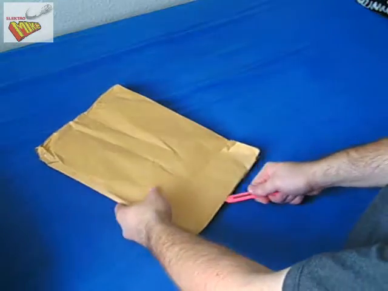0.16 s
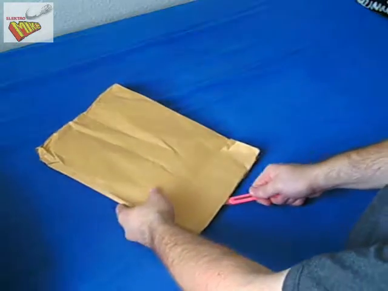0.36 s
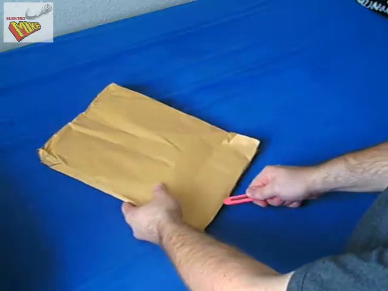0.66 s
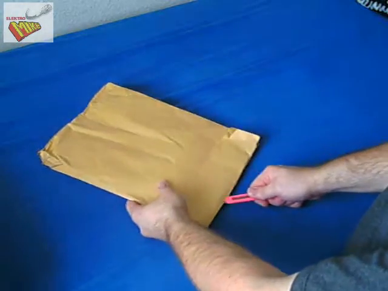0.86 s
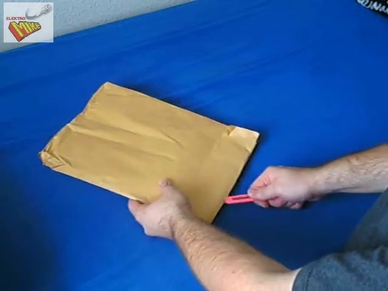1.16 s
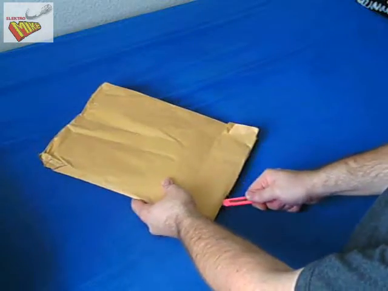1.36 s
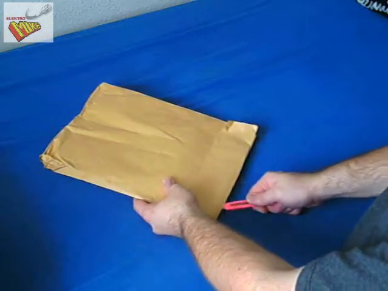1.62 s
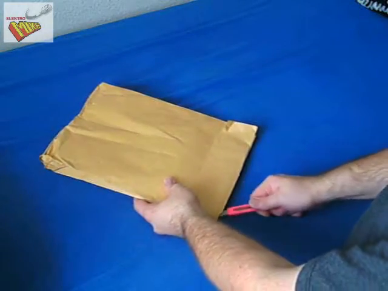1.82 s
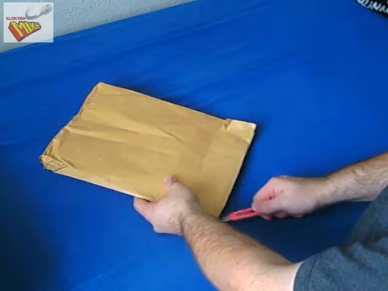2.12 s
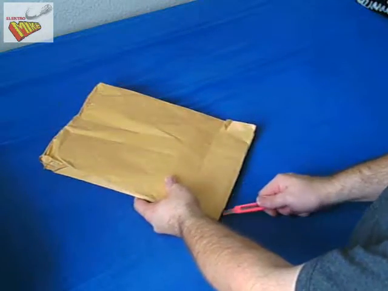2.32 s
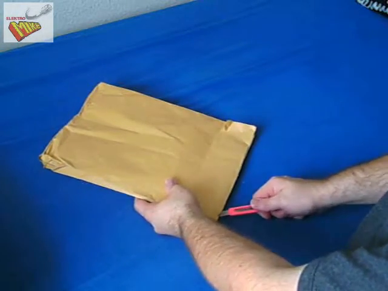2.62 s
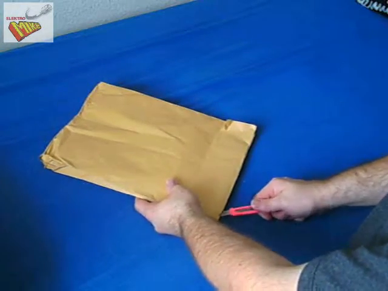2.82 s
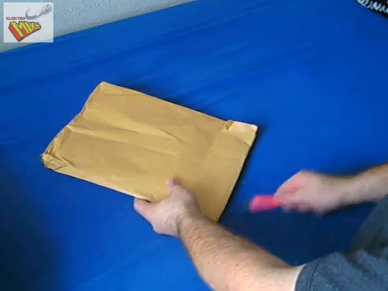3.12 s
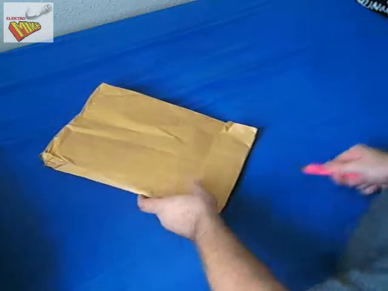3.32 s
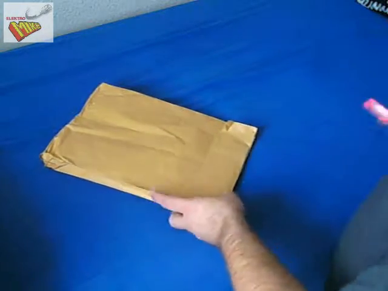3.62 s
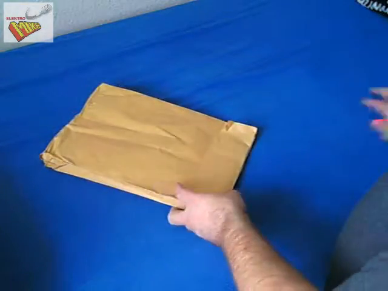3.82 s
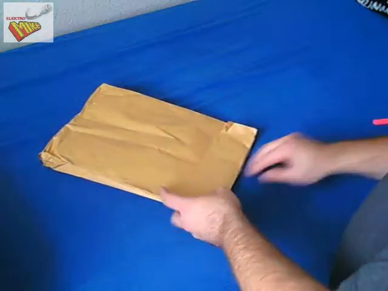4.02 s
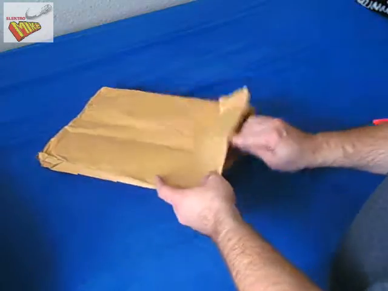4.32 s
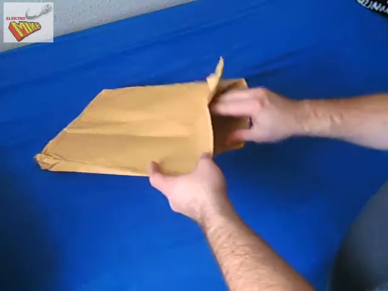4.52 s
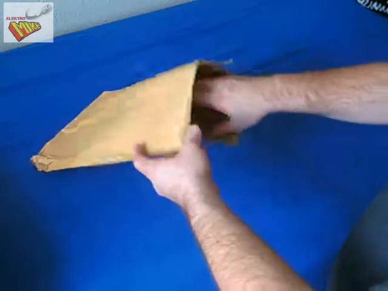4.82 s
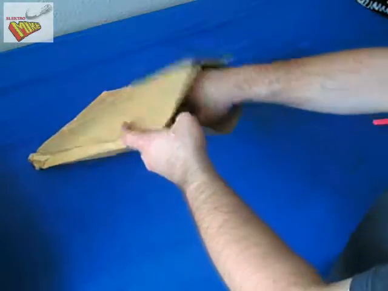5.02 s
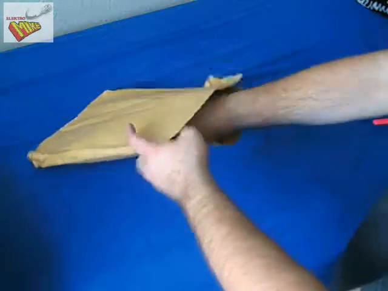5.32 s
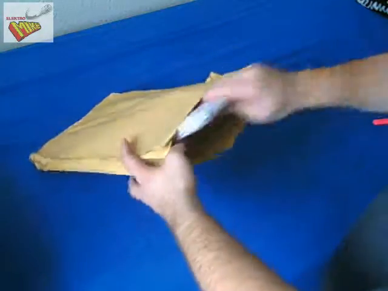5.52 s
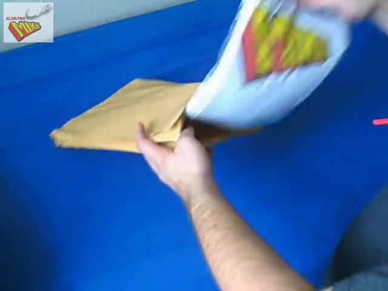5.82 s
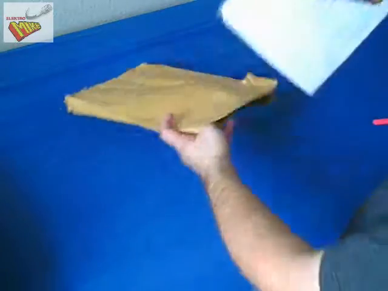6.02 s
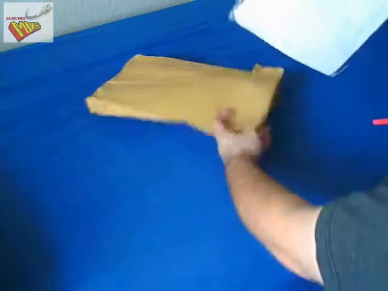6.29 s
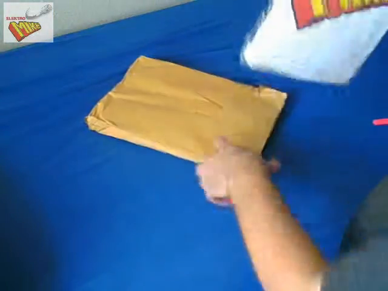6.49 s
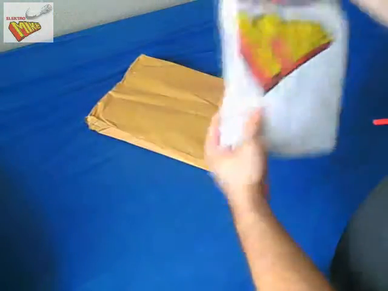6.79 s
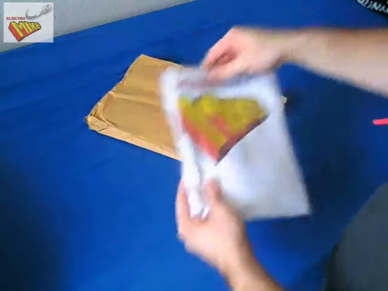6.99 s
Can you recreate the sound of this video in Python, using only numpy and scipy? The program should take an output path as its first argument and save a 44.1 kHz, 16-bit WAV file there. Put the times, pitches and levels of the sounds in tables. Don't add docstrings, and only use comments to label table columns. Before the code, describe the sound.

A cutter slits a stiff paper envelope in short rasping strokes, its slider rattles back, then the paper pops loudly open and a plastic-wrapped parcel rustles out.

```python
import sys
import numpy as np
from scipy import signal
from scipy.fft import rfft, irfft
from scipy.io import wavfile
from scipy.ndimage import uniform_filter1d

SR = 44100
rng = np.random.default_rng(int(sys.argv[2]) if len(sys.argv) > 2 else 0)


def gain_from_db(level_db):
    decades = np.asarray(level_db, float) / 20
    return 10 ** decades


def materialize(psi):
    bounded = np.clip(np.atleast_2d(psi).T, -1, 1)
    quanta = np.round(bounded * 32767).astype(np.int16)
    wavfile.write(sys.argv[1], SR, quanta)


N = 315315

# t/s, peak level/dB, body level against it/dB, colour f/Hz, hold t/s
TEARS = [(0.046, -29, -17, 3400, 0.027), (0.074, -33.5, -22, 2700, 0.034), (0.56, -28, -17.5, 2900, 0.018),
         (0.931, -30.5, -12.5, 2190, 0.0091), (0.915, -35.5, -28, 3500, 0.028),
         (0.943, -28, -22, 3500, 0.0088), (1.956, -32.5, -34, 2920, .006),
         (2.004, -16, -21.5, 2600, 0.0078), (2.457, -34.5, -20, 3050, .021),
         (2.807, -29, -20, 3020, 0.0078), (2.906, -33, -18, 3490, 0.0146), (2.962, -37, -17, 2940, 0.039),
         (3.045, -17, -24, 3440, 0.0052), (3.061, -20.5, -19, 2070, 0.0036)]
# t/s, peak level/dB, body level against it/dB, colour f/Hz, hold t/s
STROKES = [
    (0.312, -27, -20, 2890, 0.039),
    (0.777, -30, -19, 3420, 0.054),
    (1.022, -27, -19.5, 3000, 0.034),
    (1.184, -33.5, -23.5, 2840, 0.038),
    (1.275, -19, -21, 2600, 0.022),
    (1.499, -16.5, -20.5, 2630, 0.046),
    (1.749, -16.5, -15.5, 2430, 0.029),
    (1.756, -13, -37, 3510, .028),
    (4.811, -6.5, -16, 1922, 0.03),
    (4.8145, -25, -18, 3650, 0.057),
]
# t/s, peak level/dB, body level against it/dB, colour f/Hz, hold t/s
BUCKLES = [(4.162, -37, -12.5, 2960, 0.026), (4.325, -23.5, -17, 1590, .017), (4.36, -26, -9, 3500, 0.0091),
           (4.556, -34.5, -9, 2680, 0.0053), (4.683, -39.5, -8.5, 2180, .022),
           (4.792, -16.5, -17.5, 2003, .01), (4.9405, -11, -13.5, 3130, 0.011),
           (5.015, -18.5, -10, 1840, .01), (5.046, -21, -23, 1710, .006), (5.421, -44, 1.5, 2815, 0.014),
           (5.678, -36, -10.5, 2900, 0.039), (5.85, -30.5, -18, 3730, 0.059),
           (6.166, -24.5, -14, 1424, 0.0076), (6.187, -36.5, -2.5, 3040, 0.032),
           (6.2, -50.5, -18, 2490, 0.0081)]
# t/s, peak level/dB, body level against it/dB, colour f/Hz, hold t/s
PULLS = [
    (5.551, -33.5, -16, 3450, .022),
    (5.751, -26.5, -16, 1480, .05),
    (5.916, -26, -11, 1430, 0.04),
    (6.445, -30.5, -9, 1970, 0.031),
    (6.857, -32.5, -14.5, 2400, 0.066),
    (6.937, -61, -2.5, 2020, 0.02),
]
# t/s, peak level/dB, body level
# against it/dB, colour f/Hz
SNAPS = [(0.176, -24, -12.5, 2580), (0.248, -36, -33, 2970), (0.459, -18.5, -26, 2840),
         (0.465, -30.5, -10, 2900), (0.673, -14, -19, 3000), (0.712, -22, -13, 3510),
         (0.974, -27, -9, 1750), (1.321, -24.5, -35, 2630), (1.417, -22, -23, 2340),
         (1.631, -16.5, -22.5, 3570), (1.648, -16, -28, 1990), (2.04, -25.5, -18, 2490),
         (2.174, -44, -29, 3350), (2.204, -44, -20, 2900), (2.248, -52, -3, 2500),
         (2.674, -44.5, -16, 3020), (2.705, -44, -18.5, 2350), (2.821, -50, -2, 2910),
         (2.994, -43, -2, 2000), (3.806, -28.5, -17, 3310), (3.969, -41.5, -17, 2920),
         (4.211, -34.5, -14.5, 2350), (4.255, -28, -12, 1520), (4.297, -27, -11.5, 1580),
        (4.425, -40, -8, 3300), (4.53, -38.5, -18.5, 2980), (4.593, -43.5, -28.5, 3005),
        (4.802, -29, -5, 2520), (4.826, -4.5, -20.5, 1820), (4.939, -23.5, -19, 3200),
        (5.017, -11, -20, 1930), (5.053, -15.5, -9, 1640), (5.17, -18.5, -16, 2790),
        (5.3, -40.5, -15, 3123), (5.347, -27.5, -18, 1490), (5.545, -22, -36, 3520),
        (5.759, -26.5, -6, 1380), (6.189, -21.5, -18.5, 3020), (6.205, -30, -9, 2520),
        (6.213, -18.5, -17, 2630), (6.392, -40.5, -13, 3000), (6.446, -30, -32, 3500),
        (6.544, -40.5, -13.5, 3410), (6.848, -26.5, -27, 2340), (7.065, -32.5, -7.5, 3000)]
# t/s, peak level/dB, body level against it/dB, colour f/Hz
TICKS = [
    (6.015, -35.5, -23, 3060),
    (6.727, -41, -28, 2900),
    (6.752, -40, -23, 2400),
    (6.761, -40, -17, 2000),
    (6.774, -24, -21.5, 3250),
    (6.938, -23.5, -24.5, 2720),
    (6.96, -20.5, -21, 3000),
    (6.984, -32, -14, 2500),
    (7.029, -36, -25, 3200),
]
# t/s, peak level/dB, pitch f/Hz, push t/s
KNOCKS = [(0.185, -53.5, 1010, .015), (0.418, -41.5, 910, .02), (0.684, -33.5, 1050, 0.017),
          (1.131, -43, 860, 0.018), (1.194, -36, 1120, 0.009), (2.246, -37, 651, 0.0046),
          (2.247, -38.5, 1090, .01), (3.066, -24, 930, 0.012), (3.286, -33, 888, 0.015),
          (3.561, -31, 666, .011), (3.702, -30, 950, 0.012), (4.115, -39, 657, .009),
          (4.296, -48, 1130, 0.01), (4.4, -43, 1120, 0.003), (4.633, -33.5, 1030, .012),
          (4.765, -33, 1140, .017), (4.837, -20.5, 1160, .016), (5.054, -18, 1650, 0.011),
          (5.206, -30.5, 920, 0.024), (5.757, -28, 1140, 0.019), (5.922, -41, 907, .012),
          (6.123, -33, 1155, 0.033), (6.148, -35, 764, 0.061), (6.391, -32.5, 905, 0.033),
          (6.449, -27.5, 1380, 0.013), (6.603, -36.5, 780, 0.011), (7.066, -43, 1040, 0.05)]
# t/s, peak level/dB, pitch f/Hz, push t/s
BOOMS = [
    (4.817, -14, 660, .018),
    (4.944, -12, 680, .012),
    (4.955, -9, 657, .014),
    (5.018, -14, 620, .018),
]
# t/s, peak level/dB, pitch f/Hz, push t/s
PLUCKS = [
    (1.034, -21, 2150, 0.019),
    (2.814, -38, 2040, 0.0075),
    (3.065, -14.5, 2000, 0.0086),
    (3.149, -44, 2060, 0.017),
    (4.816, -6, 1840, 0.0057),
]
# t/s, peak level/dB, ring f/Hz, ring t/ms, lower ring level/dB
RATCHET = [
    (3.4474, -15, 3700, .6, -9),
    (3.4556, -13, 3700, .6, -11),
    (3.4735, -17, 3650, .55, -4),
    (3.481, -15, 3600, .5, -3),
    (3.518, -15, 3750, .6, -8),
    (3.5498, -12, 3100, .48, -14),
    (3.577, -10, 2900, .5, -20),
    (3.5952, -3.5, 3100, .5, -26),
    (3.6086, -4, 3050, .5, -24),
    (3.639, -9, 3200, .45, -6),
]
# t/s, rustle level/dB
RUSTLE = [(0.0, -48), (0.28, -62), (0.499, -53.5), (1.302, -53), (1.81, -49), (2.1, -64), (2.7, -67.5),
          (3.01, -57.5), (3.201, -63), (3.94, -62), (4.3, -56.5), (4.961, -50), (5.2, -56.5), (5.6, -38),
          (5.88, -41), (6.15, -51), (6.7, -64.5), (7.15, -47.5)]
# f/Hz, width f/Hz, level/dB
SHEET = [(657, 7.9, 3), (895, 75, 0), (1100, 22, 8)]
# f/Hz, time to fall 60 dB t/s
ROOM = [(250, 0.28), (700, 0.32), (2000, 0.33), (4000, 0.21)]
# f/Hz, level/dB
MICROPHONE = [(150, -2), (300, 1), (420, -1), (650, 1), (1200, -3.5), (2500, -0.72), (3800, 1.5)]
# f/Hz, level per Hz/dB
HISS = [(29, -17.5), (50, -10), (186, -10.5), (600, -15), (1190, -13.5), (2850, -19), (3900, -24.5),
        (5070, -58)]
# f/Hz, rms level/dB
WHINE = [(1782, -79), (2078, -74), (2676, -74.5), (2972, -68.5), (3268, -77.5), (3564, -70), (3860, -75)]


def evened(x):
    return x / np.sqrt(np.mean(x ** 2) + 1e-20)


def read(points, hz):
    f, value = np.transpose(points)
    return np.interp(np.log(hz + 1), np.log(f + 1), value)


def add(mix, s, sound):
    part = mix[round(s * SR):][:len(sound)]
    part += sound[:len(part)]


def band(x, lo_hz, hi_hz):
    return signal.sosfilt(signal.butter(N=2, Wn=[lo_hz, hi_hz], btype="band", fs=SR, output="sos"), x)


def resonate(x, hz, width):
    turn = np.exp(2j * np.pi * hz * np.arange(len(x)) / SR)
    r = np.exp(-np.pi * width / SR)
    return 2 * (turn * signal.lfilter([1 - r], [1, -r], x / turn)).real


def crackle(size, per_s, spread_db):
    when, sign, force = rng.random((size, 3)).T
    breaks = when < per_s / SR
    return evened(breaks * np.sign(sign - 0.5) * gain_from_db(-spread_db * np.log(force + 0.0036)))


def paper(drive, body_db, hz):
    edge = band(drive, 1600, 3700) + 1.25 * resonate(drive, hz, 600)
    modes = sum(gain_from_db(db) * resonate(drive, f, 2.58 * width) for f, width, db in SHEET)
    sheet = band(drive, 360, 2800) + 1.306 * modes
    return gain_from_db(11.5) * edge - gain_from_db(body_db + 23.5) * sheet


def tears():
    out, t = np.zeros(N), np.arange(12000) / SR
    stroke_rise_s = 0.00686
    for rows, rise_s, t60_s in ((TEARS, 0.006, 0.095), (BUCKLES, 0.0026, 0.098),
                                (STROKES, stroke_rise_s, 0.071), (PULLS, stroke_rise_s, 0.13)):
        for s, db, body_db, hz, hold_s in rows:
            fibres = crackle(len(t), 7000, 2.6)
            swell = np.minimum(t / rise_s, 1)
            fade = gain_from_db(-60 * np.maximum(t - hold_s, 0) / t60_s)
            add(out, s, gain_from_db(db - 17.5) * paper(fibres * swell * fade, body_db, hz))
    return out


def snaps():
    out, t = np.zeros(N), np.arange(6000) / SR
    for rows, settle_db in ((SNAPS, -14), (TICKS, -22)):
        for s, db, body_db, hz in rows:
            after_db = settle_db - 0.2 * (db + 28.5)
            drive = gain_from_db(after_db - 6.5) * crackle(len(t), 4000, 3.7) * gain_from_db(-60 * t / 0.13)
            drive[40] += 1
            add(out, s, gain_from_db(db + 2) * paper(drive, body_db, hz))
    return out


def knocks():
    out, t = np.zeros(N), np.arange(5000) / SR
    for rows, width_hz in ((KNOCKS, 484), (BOOMS, 65), (PLUCKS, 220)):
        for s, db, hz, push_s in rows:
            drive = crackle(len(t), 4000, 3.0) * np.exp(-t / push_s)
            drive[40] += 5.0
            boom = resonate(resonate(drive, hz, width_hz), hz, 3 * width_hz)
            panels = gain_from_db(-14.5) * band(drive, 400, 1900)
            add(out, s, gain_from_db(db + 4) * (boom + panels))
    return out


def ratchet():
    out, t = np.zeros(N), np.arange(-150, 150) / SR
    for s, db, hz, ms, low_db in RATCHET:
        tick = np.sin(2 * np.pi * hz * t) * np.exp(-(1000 * t / ms) ** 2)
        low = np.sin(2 * np.pi * 2150 * t) * np.exp(-((t - 0.0004) / 0.0006) ** 2)
        add(out, s + t[0], gain_from_db(db) * (tick + gain_from_db(low_db) * low))
    return out


def rattle():
    out, t = np.zeros(N), np.arange(8000) / SR
    shell_db, buzz_db, buzz_t60_s = -18, -4, 0.06
    for s, db, *_ in RATCHET:
        buzz = band(band(crackle(len(t), 2000, 4.5), 1900, 4100), 1900, 4100)
        thud = np.exp(-t / 0.00011)
        murmur = 0.12 * rng.standard_normal(len(t)) * np.exp(-t / 0.022)
        add(out, s, gain_from_db(db + shell_db) * band(thud + murmur, 250, 1700))
        add(out, s, gain_from_db(db + buzz_db - 60 * t / buzz_t60_s) * buzz)
    return out


def rustle():
    s, db = np.transpose(RUSTLE)
    level_db = np.interp(np.arange(N) / SR, s, db)
    flutter = evened(uniform_filter1d(uniform_filter1d(rng.standard_normal((3, N)), 500), 500))
    drive = crackle(N, 3500, 2.2) * gain_from_db(1.8 * flutter)
    bright = evened(band(drive[0], 1300, 3400)) * gain_from_db(level_db - 4.0)
    film = evened(band(drive[1], 3010, 4300)) * gain_from_db(-55 + 0.81 * (level_db + 49.5))
    body = evened(band(drive[2], 270, 1300)) * gain_from_db(-55.5 + 0.61 * (level_db + 47))
    return bright - film - body


def room(x):
    out, at = np.zeros(N), np.arange(180, SR // 2 - 20, 20)
    for k in range(3):
        taps = np.zeros(SR // 2)
        taps[at + rng.integers(0, 20, len(at))] = rng.choice([-1., 1.], len(at))
        hz, t, z = signal.stft(taps, SR, nperseg=256)
        fade = gain_from_db(-60 * t / read(ROOM, hz)[:, None])
        fade = fade + gain_from_db(8.0 - 60 * t / 0.017)
        tail = signal.istft(z * fade, SR, nperseg=256)[1]
        tail[:170] = 0
        share = np.sqrt(2 / 3) * np.cos(2 * np.pi * (3.1 * np.arange(N) / SR + k / 3))
        out += signal.fftconvolve(x * share, tail / np.linalg.norm(tail))[:N]
    return out


def camera_noise():
    hz, t = np.fft.rfftfreq(N, 1 / SR), np.arange(N) / SR
    hiss = evened(irfft(rfft(rng.standard_normal(N)) * gain_from_db(read(HISS, hz)), N))
    whine = sum(np.sqrt(2) * gain_from_db(db) * np.sin(2 * np.pi * (f * t + rng.random())) for f, db in WHINE)
    return gain_from_db(-62.5) * hiss + whine


def scene():
    handled = tears() + snaps() + knocks() + rustle()
    knife = ratchet() + rattle()
    heard = handled + knife + room(gain_from_db(-8.5) * handled + gain_from_db(-7.5) * knife)
    tone = gain_from_db(read(MICROPHONE, np.fft.rfftfreq(N, 1 / SR)))
    return (irfft(rfft(heard) * tone, N) + camera_noise())[None]


def roll_off(x):
    return signal.sosfilt(signal.butter(12, 16660, fs=SR, output="sos"), x)


def record(dry):
    camera_rate_hz, overflow_s = 8000, 4.83254
    narrow = signal.oaconvolve(dry[0], signal.firwin(551, 3960, window=("kaiser", 3.6), fs=SR), "same")
    power = uniform_filter1d(uniform_filter1d(narrow ** 2, 500), 500)
    narrow = narrow - gain_from_db(-44.0) - gain_from_db(-44.5) * np.tanh(300 * power)
    turn = 2 * np.pi * camera_rate_hz * np.arange(N) / SR
    mirror = 2 * narrow * np.cos(turn)
    second = 2 * narrow * np.cos(2 * turn)
    out = narrow + gain_from_db(-48) * band(mirror, 3900, 5000) + gain_from_db(-53) * band(mirror, 5000, 6500)
    out = out + gain_from_db(-60) * mirror + gain_from_db(-65) * band(second, 11500, 14000)
    t = np.arange(-22, 23) / SR
    swing = -gain_from_db(-4) * np.cos(2 * np.pi * 2100 * t)
    wrap = gain_from_db(-3.5) * np.sinc(2 * 15900 * t)
    add(out, overflow_s + t[0], (swing + wrap) * np.hanning(len(t)))
    return roll_off(out[None])


dry = scene()
out = record(dry)
materialize(out)
```